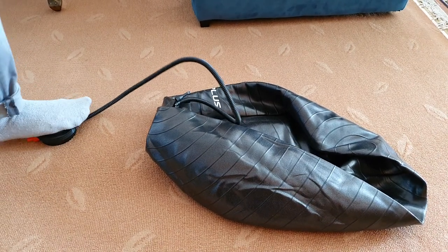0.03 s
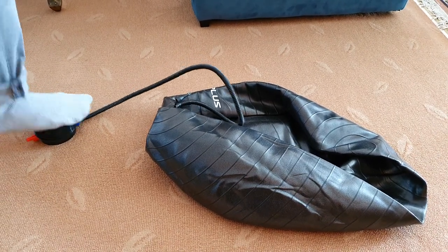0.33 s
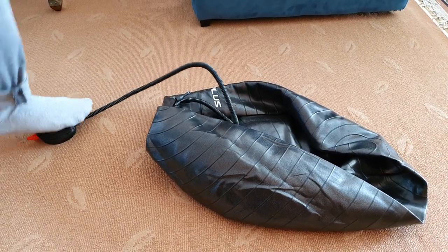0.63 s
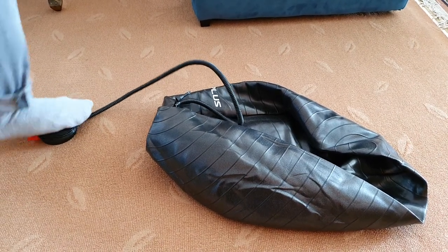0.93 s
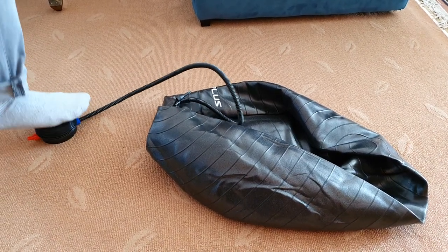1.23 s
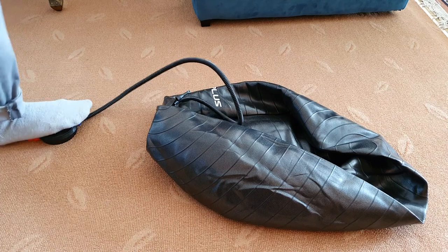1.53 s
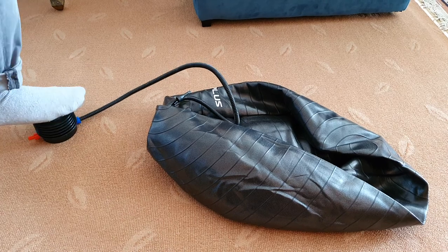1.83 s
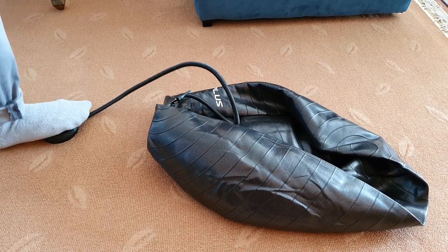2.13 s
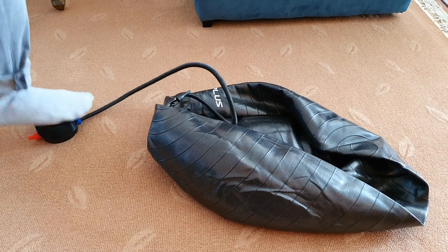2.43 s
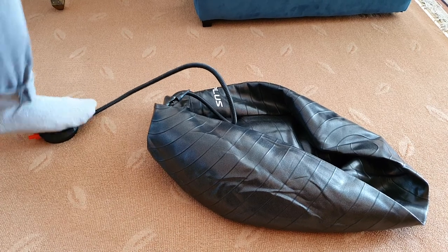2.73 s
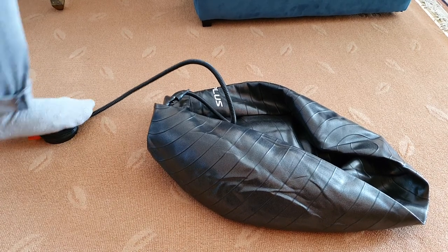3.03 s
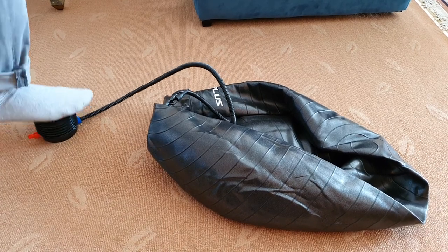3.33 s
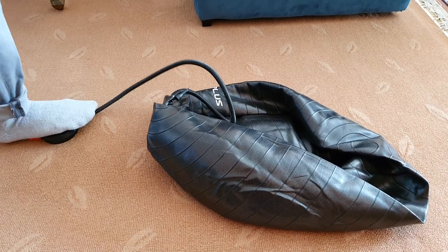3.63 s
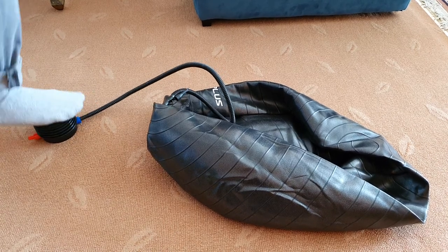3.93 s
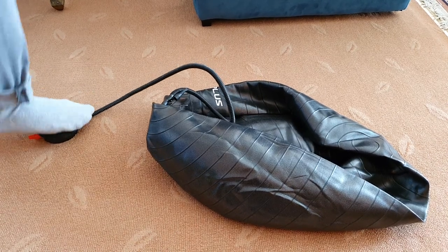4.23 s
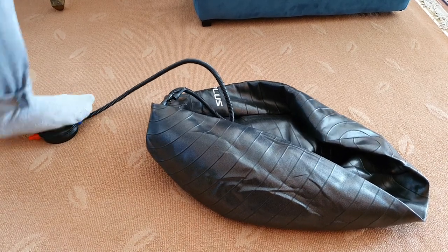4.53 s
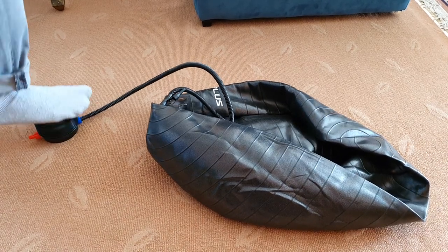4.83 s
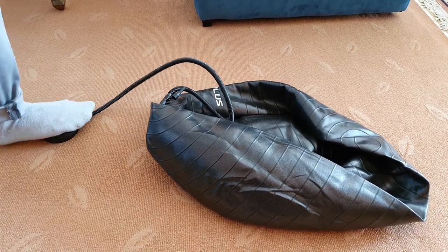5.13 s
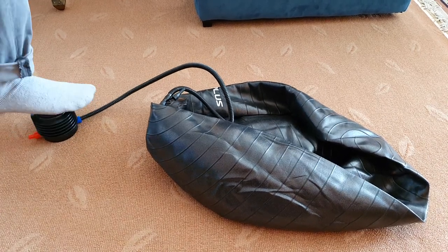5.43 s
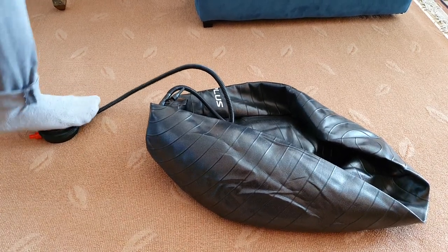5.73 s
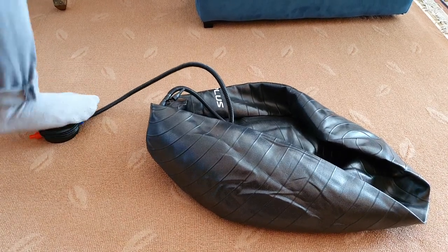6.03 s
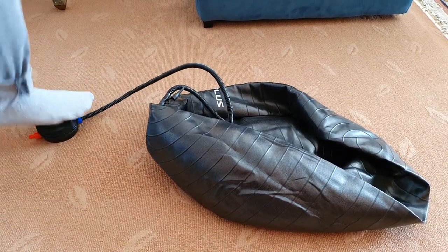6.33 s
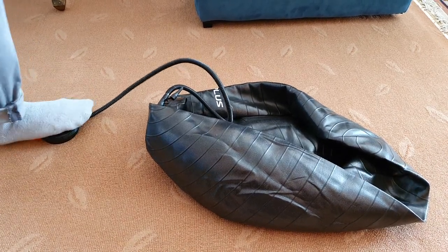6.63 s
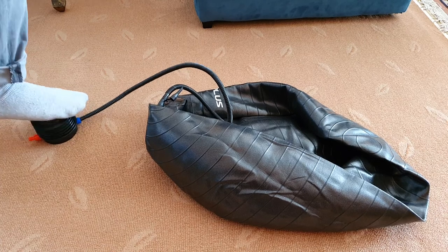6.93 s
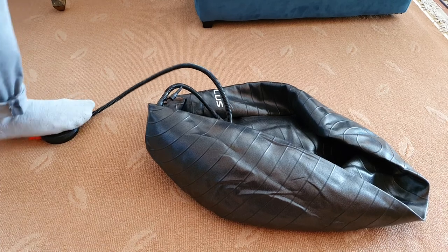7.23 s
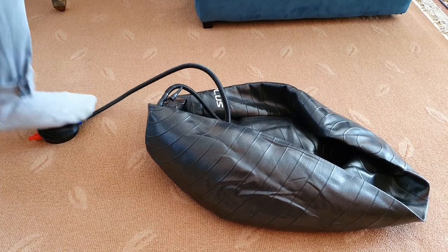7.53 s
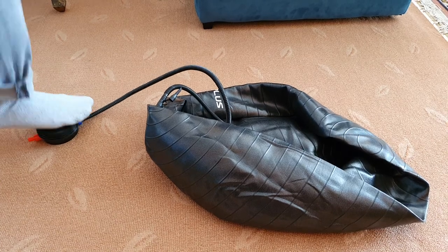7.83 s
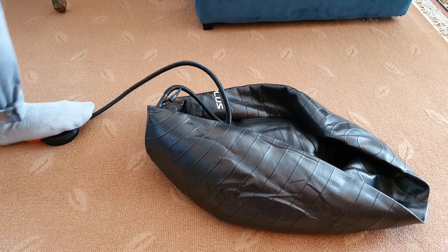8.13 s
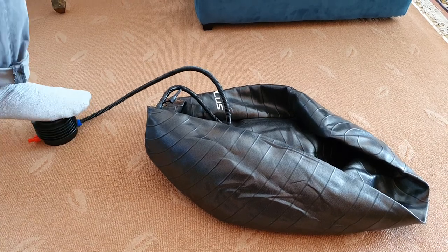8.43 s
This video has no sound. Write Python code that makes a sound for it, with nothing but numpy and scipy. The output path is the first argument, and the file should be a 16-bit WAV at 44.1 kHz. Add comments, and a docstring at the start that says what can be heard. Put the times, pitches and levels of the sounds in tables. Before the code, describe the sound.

A foot pump puffs about twice a second, each tread a valve clack and whistling rush of air, then a hissing intake.

```python
"""A bellows foot pump inflates a vinyl chair on a living room carpet, about two strokes a second.
On each tread a valve flap clacks and air rushes down the corrugated hose, which whistles on its pipe
modes. As the foot lifts, the bellows spring back and suck air in through the hissing inlet.
The chair rasps while it is slack and drums as it tightens; a quiet room tone lies underneath."""
import sys
import numpy as np
from scipy import signal
from scipy.fft import rfft, irfft, next_fast_len
from scipy.io import wavfile

SR = 44100
rng = np.random.default_rng(int(sys.argv[2]) if len(sys.argv) > 2 else 0)


def put_to_file(sound):
    """Save the sound as 16-bit audio at rate SR, in the file named by the first command-line argument."""
    columns = np.atleast_2d(sound).T  # one column per channel
    safe = np.clip(columns, -1, 1)
    whole_steps = np.round(safe * 32767)
    wavfile.write(sys.argv[1], SR, whole_steps.astype(np.int16))


N = 383669
TIME = np.arange(N) / SR
PADDED = next_fast_len(N + SR // 2)
FREQS = np.maximum(np.arange(PADDED // 2 + 1) * SR / PADDED, 1)


def from_db(db):
    """Decibels to gain."""
    return 10 ** (np.asarray(db) / 20)


def rms_one(x):
    """Scale to unit rms."""
    return x / np.sqrt(np.mean(x ** 2) + 1e-20)


def curve(points):
    """EQ curve through (f/Hz, level/dB) points."""
    hz, db = np.transpose(points)
    return from_db(np.interp(np.log(FREQS), np.log(hz), db))


def resonant(modes):
    """EQ curve of (f/Hz, half-width/Hz, level/dB) resonances."""
    return sum(from_db(db) / (1 + ((FREQS - hz) / width) ** 2) for hz, width, db in modes)


def filtered(x, response):
    """Apply a frequency response."""
    return irfft(rfft(x, PADDED) * response, PADDED)[..., :N]


def noise(response, width=0.64, width_hz=450):
    """Coloured stereo noise of rms 1, mono in the bass and wider above width_hz."""
    mid, side = rng.standard_normal((2, N))
    side = filtered(side, width / (1 + (width_hz / FREQS) ** 2))
    return rms_one(filtered(mid + side * [[1], [-1]], response))


def drift(rate_hz):
    """Smooth random modulator of rms 1, rolling off above rate_hz."""
    hop = 40
    pole = np.exp(-2 * np.pi * hop * rate_hz / SR)
    slow = signal.lfilter([1], [1, -2 * pole, pole * pole], rng.standard_normal(N // hop + 2002))[2000:]
    return np.interp(np.arange(N) / hop, np.arange(len(slow)), rms_one(slow))


def swell(peak_s, rise, fall, db, shape, onset=1):
    """Air envelope, 20 dB down rise s before and fall s after its peak; onset > 1 sharpens the attack."""
    near = slice(max(int((peak_s - .4) * SR), 0), int((peak_s + .4) * SR))
    t, out = TIME[near] - peak_s, np.zeros(N)
    drop = np.where(t < 0, np.abs(t / rise) ** (shape * onset), np.abs(t / fall) ** shape)
    out[near] = from_db(db - 20 * drop)
    return out


def strike(out, s, hz, db, t60, contact_s):
    """Add a damped sine at time s; a longer contact softens its attack."""
    start = int(s * SR)
    if 0 <= start < N:
        t = TIME[:min(SR // 4, N - start)]
        envelope = from_db(db - 60 * t / t60) * (1 - np.exp(-t / contact_s))
        out[start:start + len(t)] += envelope * np.sin(2 * np.pi * hz * t)


def in_room(x, pan, wet_db, t60=0.19, left_lead_s=0.00023):
    """Direct sound and a short diffuse tail at two close microphones, panned by frequency."""
    t = TIME[:SR // 2]
    tails = rng.standard_normal((2, len(t))) * from_db(-60 * t / t60) * (t > .003)
    mid, side = rfft(tails / np.sqrt(np.sum(tails ** 2) / 2), PADDED)
    ears = np.array([[1], [-1]])
    coherence = 1 / (1 + (FREQS / 1000) ** 2)
    diffuse = np.sqrt((1 + coherence) / 2) * mid + ears * np.sqrt((1 - coherence) / 2) * side
    direct = np.exp(1j * np.pi * FREQS * left_lead_s * ears)
    balance = curve(pan) ** (ears / 2)
    balance = balance / np.sqrt(np.mean(balance ** 2, axis=0))
    wet = from_db(wet_db)
    return filtered(x, balance * (direct + wet * diffuse) / np.hypot(1, wet))


# EQ of the room tone: f/Hz, level/dB
ROOM_EQ = [(25, -28), (32, -7.5), (43, 5), (60, -1), (100, -4.5), (150, -8), (220, -4.5), (500, -16),
           (2000, -40), (16000, -51)]
def room_tone():
    """A faint, narrow bed of low rumble."""
    return from_db(-55.0) * noise(curve(ROOM_EQ), width=0.22, width_hz=20)


# cue sheet for all pump layers, a row per tread; a faster tread sings higher: clack t/s,
# press to peak flow t/s, clack level/dB, vortex f/Hz, pitch spread/Hz, whistle level/dB,
# clack to refill peak t/s
STROKES = [(-.19, 0.13, -35.5, 2750, 150, -28.5, 0.33), (0.3094, 0.14, -27, 2720, 60, -27.5, 0.35),
           (0.8465, 0.13, -27, 3120, 200, -27, 0.38), (1.3784, 0.12, -24.5, 3220, 200, -31.5, .36),
           (1.8942, 0.13, -24, 3103, 40, -26.5, 0.37), (2.421, .11, -24.5, 3550, 190, -26.5, 0.36),
           (2.9386, 0.12, -23, 3370, 60, -24.5, 0.34), (3.4329, 0.12, -24, 3350, 249, -25.5, .36),
           (3.9336, 0.12, -20.5, 3290, 169, -26.5, 0.36), (4.4474, .12, -23.5, 3495, 149, -26, 0.36),
           (4.9666, 0.13, -23.5, 3260, 170, -26.5, 0.34), (5.4774, .11, -25.5, 3540, 240, -24.5, 0.33),
           (5.9719, 0.13, -24, 3135, 70, -26.5, 0.36), (6.4861, 0.12, -24.5, 3366, 201, -26, 0.35),
           (6.9977, 0.1, -24.5, 3460, 200, -26.5, 0.34), (7.502, 0.11, -26, 3380, 191.4, -27, 0.33),
           (7.993, 0.11, -26.5, 3370, 176, -28.5, .35), (8.5025, 0.11, -23, 3570, 185, -25, .35)]
# folds of the bellows popping open: t/s, level/dB
FOLD_POPS = [(0.606, -41), (3.224, -39), (4.237, -39.5), (5.746, -36.5)]
def pump_body(knock_hz=95, knock_db=-35, after_peak_s=0.113):
    """The pump bottoms out on the carpet with a soft knock; now and then a fold pops as it springs back."""
    out = np.zeros(N)
    for s, press, *_ in STROKES:
        detune, softer = rng.uniform(-1, 1, 2)
        hz = knock_hz * (1 + 0.11 * detune)
        strike(out, s + press + after_peak_s, hz, knock_db - 0.5 * softer, t60=0.063, contact_s=0.0048)
    for s, db in FOLD_POPS:
        strike(out, s, 200, db, t60=0.1, contact_s=0.0098)
        strike(out, s, 315, db, t60=0.096, contact_s=0.0017)
    return out


# EQ of the inlet hiss: f/Hz, level/dB
INLET_EQ = [(150, -29), (330, 6.5), (560, -8), (1200, 2), (1900, -9), (2700, -9), (3700, -5), (4400, -2),
            (5400, -5.5), (6600, 3.5), (7900, -1.5), (10000, -2.5), (11900, 4.5), (15500, -12)]
# resonances of the cavity behind the inlet: f/Hz, half-width/Hz, level/dB
CAVITY_MODES = [(2394, 123, -1), (2757, 220, 2)]
def inlet(rise_s=0.062, fall_s=0.13, opens_early_s=0.071, flutter_db=1.74):
    """The inlet snaps open and its cavity sounds at once; the bright hiss needs faster air and follows."""
    flow, draught = np.zeros((2, N))
    for s, *_, refill in STROKES:
        peak_s = s + refill
        gate = np.clip((TIME - peak_s + opens_early_s) / 0.0021, 0, 1)
        flow += swell(peak_s, rise_s, fall_s, db=-33.5, shape=2.56)
        draught += gate * swell(peak_s, rise_s * 1.11, fall_s * 1.01, db=-35.0, shape=2.1)
    hiss = flow * noise(curve(INLET_EQ))
    cavity = draught * noise(resonant(CAVITY_MODES))
    return (hiss + cavity) * from_db(flutter_db * drift(22))


def slackness(empty_db=-3.5, skins_part_s=1.98, parting_s=0.62, parting_db=4.5, tighten_db_per_s=3.5):
    """How limp the chair is: steady until its skins part, then falling towards 0 (taut)."""
    filling_s = np.maximum(TIME - skins_part_s, 0)
    parted = np.minimum(filling_s / parting_s, 1)
    return from_db(empty_db - parting_db * parted - tighten_db_per_s * filling_s)


# flap modes beside its main ring: f/Hz, relative level/dB, t60/s
FLAP_MODES = [(813, -13, 0.013), (1094, -9.5, 0.019), (2690, -2.5, 0.0064), (4630, -9.5, 0.0049),
              (5460, -9, 0.0039)]
# thump modes of the bellows: f/Hz, relative level/dB, t60/s
BELLOWS_MODES = [(214, -21.5, 0.13), (346, -7, 0.037), (428, 3.5, 0.02)]
def valve_clack(slack_hz=2400, taut_hz=2624, thump_lead_s=0.0022, bounce_s=0.002322, bounce_db=-4.5):
    """The pressure step thumps the bellows; a moment later the flap slaps its seat and bounces once."""
    out, slack = np.zeros(N), slackness()
    for s, _, clack_db, *_ in STROKES:
        slap_db, thump_db = clack_db + 13.5, clack_db + 5.0
        # the flap rings higher as the pressure behind it grows
        ring_hz = taut_hz + (slack_hz - taut_hz) * np.interp(s, TIME, slack)
        strike(out, s - .0005, ring_hz, slap_db, t60=0.016, contact_s=0.0013)
        for hz, db, t60 in FLAP_MODES:
            detune, force_db = rng.normal(0, [.025, 1])
            mode_db = slap_db + db
            strike(out, s, hz * (1 + detune), mode_db + force_db, t60, contact_s=0.00067)
            strike(out, s + bounce_s, hz * (1 - detune), mode_db + bounce_db, t60, contact_s=0.00033)
        for hz, db, t60 in BELLOWS_MODES:
            strike(out, s - thump_lead_s, hz * rng.uniform(.96, 1.04), thump_db + db, t60, contact_s=.0016)
    return out


# resonances of the slack chair and its valve: f/Hz, half-width/Hz, level/dB
RASP_MODES = [(284.7, 12, 18.5), (616, 33, -12), (1352, 55, 11.5), (1590, 35, 1), (1844, 27, 14.5),
              (2330, 74, 2.5), (3350, 420, 7.5), (4400, 210, 2)]
# EQ of the drumming skin: f/Hz, level/dB
DRUM_EQ = [(30, -8), (50, 0), (105, 0), (150, -16.5), (205, 7), (250, -7), (500, -30), (2000, -60)]
def chair(flow, slack):
    """Incoming air makes the limp vinyl rasp; the skin drums louder as it tightens."""
    rasp = flow * slack * from_db(5.0) * noise(resonant(RASP_MODES))
    drum = flow * (1 - slack) * from_db(-10.0 + 0.4 * TIME) * noise(curve(DRUM_EQ))
    return rasp + drum


# EQ of the turbulence in the hose: f/Hz, level/dB
RUSH_EQ = [(100, -9), (170, -35), (240, -5), (300, 7), (400, 0.5), (500, -4.5), (650, -0.5), (1100, -8),
           (1900, -4), (2700, -5), (4300, -11.5), (7000, -19.5)]
def hose_rush(hose_hz=152, echo=0.037, loss_hz=5000, flutter_db=2.0):
    """Turbulence echoes faintly between the ends of the hose; the same flow drives the chair."""
    round_trip = echo * np.exp(-FREQS / loss_hz - 2j * np.pi * FREQS / hose_hz)
    slack = slackness()
    flow = sum(swell(s + press, press * 0.6636, 0.1242, db=-42, shape=1.81) for s, press, *_ in STROKES)
    flow = flow * from_db(13.0 * slack)   # louder into a limp chair
    first_puff = sum(swell(s + 0.011, 0.022, 0.15, db=-45.0, shape=2.3) for s, *_ in STROKES)
    envelope = np.hypot(flow / (1 + slack), first_puff) * from_db(6.0)
    rush = envelope * noise(curve(RUSH_EQ) / (1 - round_trip))
    return (rush + chair(flow, slack)) * from_db(flutter_db * drift(47))


# EQ of the outlet jet: f/Hz, level/dB
JET_EQ = [(1500, -47), (3000, 4), (4300, 11.5), (5300, 7.5), (6700, 16), (7700, 8), (9000, 13.5),
          (11500, 12), (13500, 6.5), (16000, -15)]
# narrow resonance of the outlet valve: f/Hz, half-width/Hz, level/dB
NOZZLE_MODE = [(4304, 38, 19)]
def outlet_jet(usual_db=-32.5, usual_vortex_hz=3390, db_per_octave=8, flutter_db=2.06):
    """Bright hiss of air squeezed through the outlet valve, louder on faster, higher-pitched treads."""
    flow = np.zeros(N)
    for s, press, _, vortex_hz, *_ in STROKES:
        db = usual_db + db_per_octave * np.log2(vortex_hz / usual_vortex_hz)
        flow += swell(s + press, rise=press * 0.84, fall=0.092, db=db, shape=1.82)
    return flow * from_db(flutter_db * drift(19)) * noise(curve(JET_EQ) + resonant(NOZZLE_MODE))


def harmonic(modes, order):
    """One harmonic of all the complex modes, levelled to rms 1; the strongest lead in the overtones."""
    partials = modes ** order
    return partials.real.sum(axis=0) / np.sqrt(np.sum(np.abs(partials) ** 2, axis=0) / 2)


# pipe modes of the hose that can sing: f/Hz, relative level/dB
HOSE_MODES = [(2765, 8.5), (2970, 10), (3090, 7), (3265, 3.5), (3413, 3), (3567, 8.5), (3733, 6), (3903, 2),
              (4070, 6)]
def hose_whistle(lag_s=0.006, fall_s=0.077, bend=0.12, droop=0.0047, tail_db=-8.5, shrill_db=-22):
    """Vortices shed at the corrugations feed the pipe modes near their pitch, which climbs with flow."""
    clack_s, press, _, pitch_hz, spread_hz, whistle_db, _ = np.transpose(STROKES)
    peak_s = clack_s + press + lag_s   # the whistle needs fast air: a short, slightly late surge
    surges = list(zip(peak_s, press * 0.52, whistle_db))
    surge = sum(swell(s, rise, fall_s, db, shape=1.18, onset=2.9) for s, rise, db in surges)
    tail = sum(swell(s + 0.0079, 0.014, 0.092, db + tail_db, shape=0.41) for s, _, db in surges)
    flow = sum(swell(s, rise * 1.9, fall_s * 6, db=0, shape=1.6) for s, rise, _ in surges)
    stroke = np.searchsorted((peak_s[1:] + peak_s[:-1]) / 2, TIME)   # nearest tread
    vortex_hz = pitch_hz[stroke] * (1 + bend * (flow - .92))
    modes = []
    for hz, db in HOSE_MODES:
        share = from_db(db) / (1 + ((hz - vortex_hz) / spread_hz[stroke]) ** 2)
        share = share * from_db(4 * drift(14))   # the modes compete for the flow
        phase = 2 * np.pi * np.cumsum(hz * (1 + droop * (.9 - flow))) / SR + drift(25)
        roughness = 1 + .19 * (drift(70) + 1j * drift(70))   # turbulence shakes each line
        modes.append(share * roughness * np.exp(1j * phase))
    modes = np.array(modes)
    # only a hose blown hard against pressure turns shrill
    drive = np.tanh(surge / from_db(shrill_db)) * (1 - slackness())
    overtones = from_db(-2.0) * harmonic(modes, 2) + from_db(-13) * harmonic(modes, 3)
    return (surge + tail) * harmonic(modes, 1) + surge * drive * overtones


# pan curves of the push, refill and clack buses: f/Hz, left minus right level/dB
PUSH_PAN = [(200, -0.5), (700, -0.5), (1500, -3), (3200, -6.5), (4500, -10), (7000, -17), (9000, -10),
            (15000, -21.5)]
REFILL_PAN = [(200, 5), (500, -5), (750, 3), (1100, -4.5), (2600, -6.5), (3500, -2), (5000, -10.5),
              (6500, -14), (8500, -4), (12000, -12), (16000, -16)]
CLACK_PAN = [(200, 1), (500, -3.5), (720, 7), (1100, -8), (1600, 3), (2500, -17.5), (3500, 8),
             (5000, -14.5), (16000, -4)]
def scene():
    """Push, refill and clacks, each with its own pan and reverb, over the room tone."""
    push = in_room(hose_rush() + outlet_jet() + hose_whistle(), PUSH_PAN, wet_db=-2.0)
    refill = in_room(inlet(), REFILL_PAN, wet_db=-6.0)
    clacks = in_room(valve_clack() + pump_body(), CLACK_PAN, wet_db=-11.5)
    return push + refill + clacks + room_tone()


def record(dry, low_cut_hz=37, high_cut_hz=16000):
    """The deepest bass is removed; the top is cut steeply."""
    no_rumble = signal.sosfilt(signal.butter(4, low_cut_hz, "high", fs=SR, output="sos"), dry)
    return filtered(no_rumble, 1 / np.sqrt(1 + (FREQS / high_cut_hz) ** 160))


dry = scene()
out = record(dry)
put_to_file(out)
```